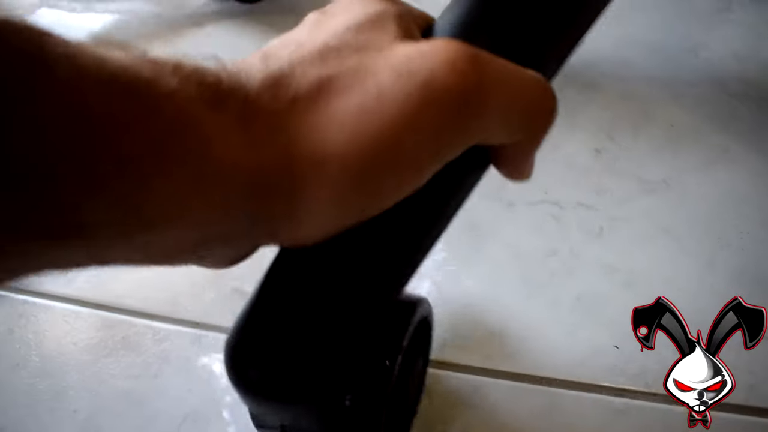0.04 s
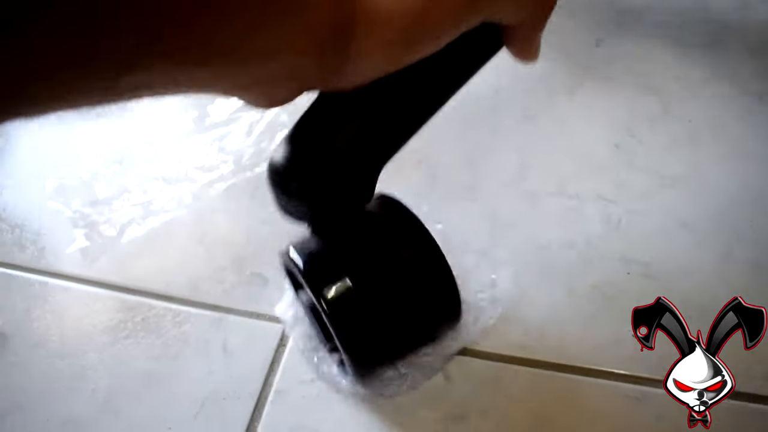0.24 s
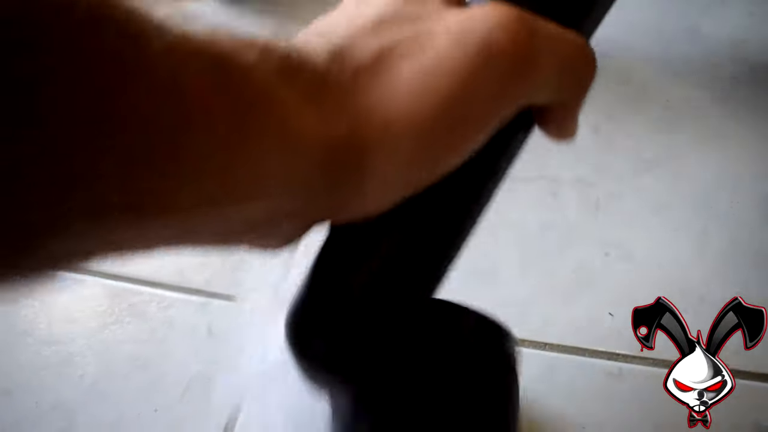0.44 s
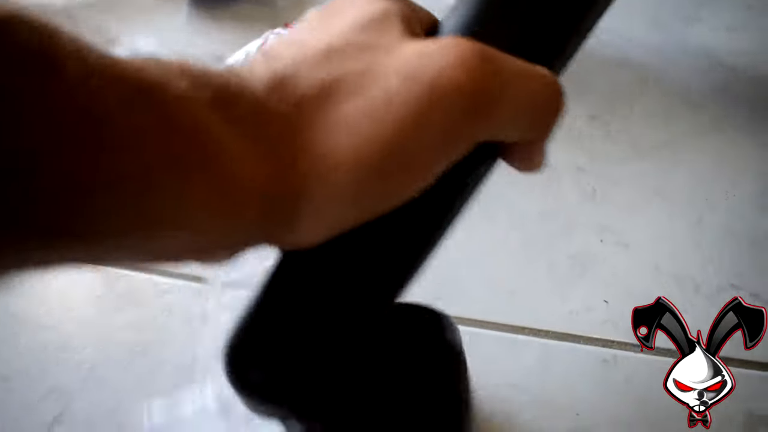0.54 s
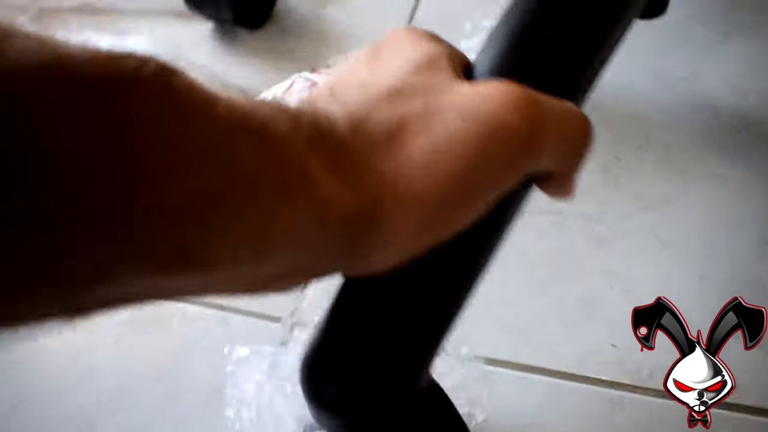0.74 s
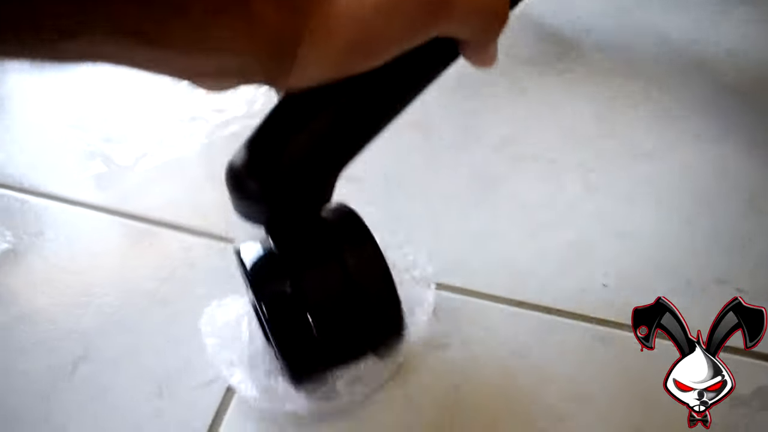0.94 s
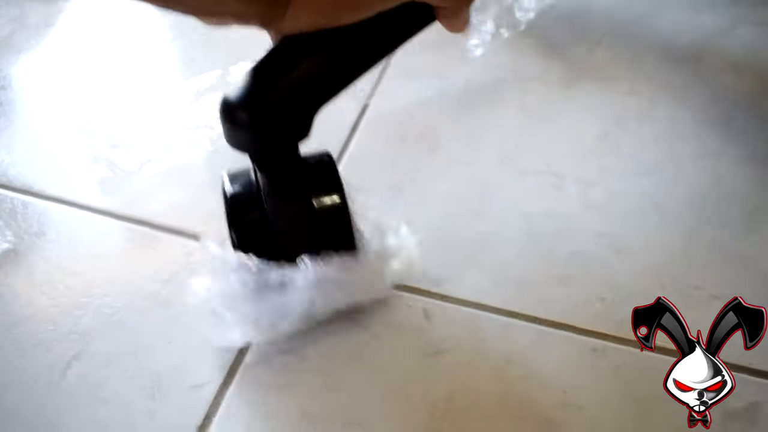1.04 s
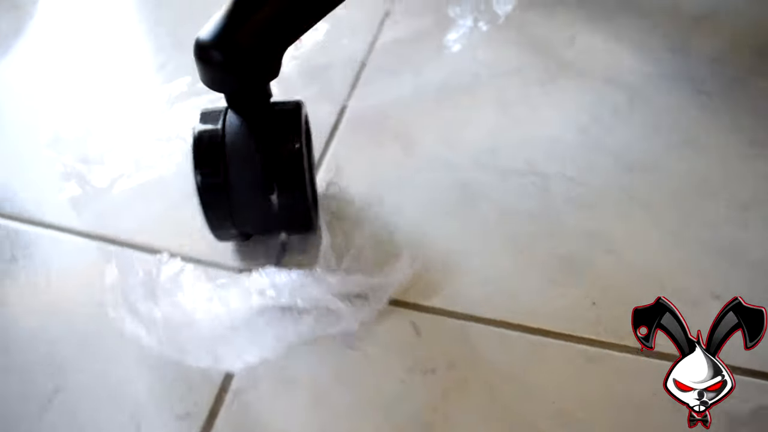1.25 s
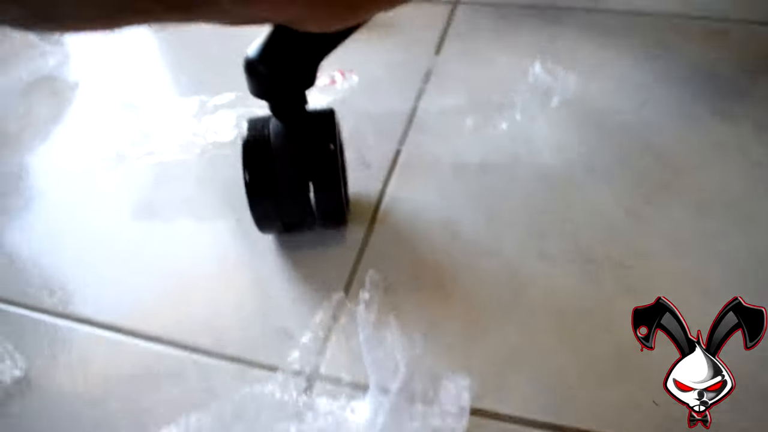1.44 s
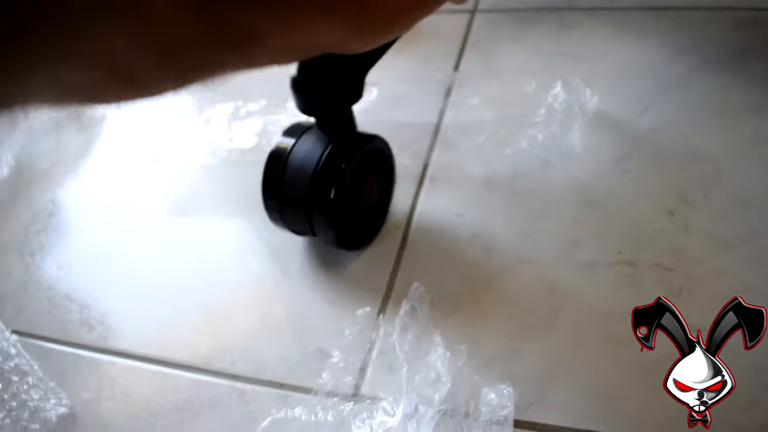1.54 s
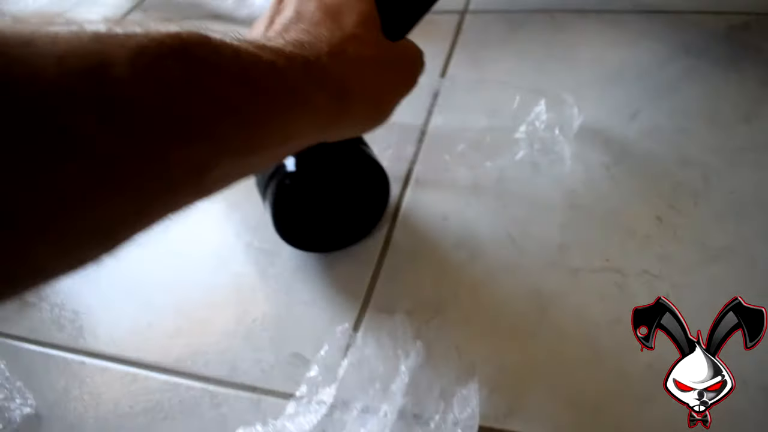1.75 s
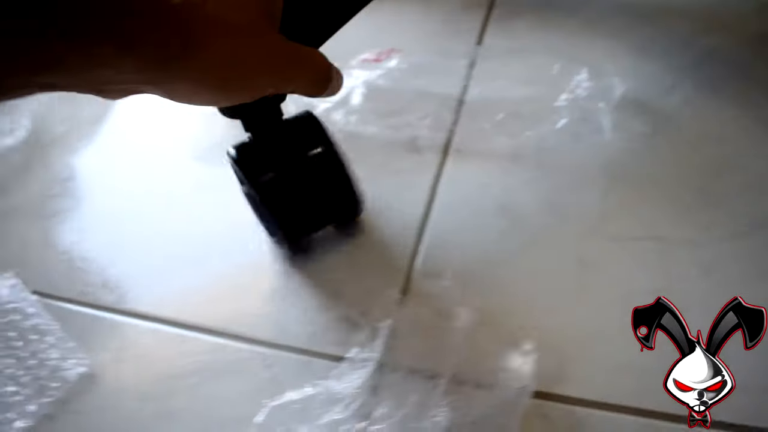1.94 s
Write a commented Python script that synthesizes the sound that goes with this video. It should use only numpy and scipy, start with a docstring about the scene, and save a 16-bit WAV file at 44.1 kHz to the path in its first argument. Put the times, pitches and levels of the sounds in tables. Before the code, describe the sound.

Bubble wrap bursts under a chair caster in sharp, irregular volleys, with film crinkling, knocks on tile and brief squeaks; the pops thin out, leaving light wheel rattles. Close microphone in a bare, reverberant tiled room.

```python
"""A bare tiled room: a chair caster is pushed over bubble wrap, close to the microphone.
Bubbles burst singly and in quick volleys, each a short pressure cycle, a noisy flutter and a bright snap.
Low thumps sound where loud bursts overload the microphone; random ticks crinkle and crunch the film.
The caster rings as decaying sines, squeaks on a wavering tone, rattles, and rolls as coloured noise.
A decaying noise tail answers as the room, and a fast limiter holds the loudest bursts down."""
import sys
import numpy as np
from scipy import signal
from scipy.fft import rfft, irfft
from scipy.io import wavfile
from scipy.ndimage import uniform_filter1d, minimum_filter1d

SR = 44100
rng = np.random.default_rng(int(sys.argv[2]) if len(sys.argv) > 2 else 0)


def materialize(psi):
    """Save the field psi as 16-bit PCM at rate SR to the path in sys.argv[1].

    A 1-D psi becomes a single channel; in a 2-D psi each row is a channel.
    """
    bounded = np.clip(np.atleast_2d(psi).T, -1, 1)
    quanta = np.round(bounded * 32767).astype(np.int16)
    wavfile.write(sys.argv[1], SR, quanta)


N = 88200


def undb(db):
    """Decibels to gain."""
    return 10 ** (np.asarray(db) / 20)


def unit(x):
    """Scale to rms 1."""
    return x / np.sqrt(np.mean(x ** 2))


def clock(size=N):
    """Time in seconds."""
    return np.arange(size) / SR


def fade(t60_s, size=N):
    """Exponential decay, falling 60 dB in t60_s."""
    return np.exp(-np.log(1000) * clock(size) / t60_s)


def curve(rows):
    """Gain along a (time_s, level_db) curve."""
    return undb(np.interp(clock(), *np.array(rows).T))


def swells(rows):
    """Gain of rounded swells from (start_s, length_s, level_db) rows."""
    gain = np.zeros(N)
    for start_s, length_s, level_db in rows:
        progress = np.clip((clock() - start_s) / length_s, 0, 1)
        gain += undb(level_db) * np.sqrt(np.abs(np.sin(np.pi * progress)))
    return gain


def colour(x, points):
    """Causal minimum-phase filter through (frequency_hz, gain_db) points."""
    size = 2 * x.shape[-1]
    hz, db = np.array(points).T
    gain_db = np.interp(np.log(np.fft.rfftfreq(size, 1 / SR) + 1), np.log(hz), db)
    # folding the cepstrum onto positive times makes the filter causal
    cepstrum = irfft(np.log(undb(gain_db)))
    cepstrum[1:size // 2] *= 2
    cepstrum[size // 2 + 1:] = 0
    response = np.exp(rfft(cepstrum))
    return irfft(rfft(x, size) * response)[..., :size // 2]


def band_noise(hz, octaves, size):
    """Noise in a bell around one frequency, at rms 1."""
    away = np.log2((np.fft.rfftfreq(size, 1 / SR) + 1) / hz) / octaves
    bell = 1 / (1 + away ** 2 + away ** 4 / 2)
    random_phase = np.exp(2j * np.pi * rng.random(len(away)))
    return unit(irfft(random_phase * bell, size))


def ticks(per_s):
    """Random impulses of either sign: many small, a few large."""
    happens = rng.random(N) < per_s / SR
    return happens * rng.random(N) ** 2 * rng.choice([-1, 1], N)


def struck(t60_s, size=N):
    """Envelope of a ring: it swells during the contact, then decays."""
    contact_s = 0.0023
    return (1 - np.exp(-(clock(size) / contact_s) ** 2)) * fade(t60_s, size)


def add(out, start_s, x):
    """Mix a sound in at a time."""
    i = max(int(start_s * SR), 0)
    out[i:i + len(x)] += x[:max(N - i, 0)]


def through(x, response):
    """Convolve with an impulse response."""
    return signal.fftconvolve(x, response)[:N]


# bursting bubbles: start_s, level_db, pitch_hz, snap_db (treble)
BUBBLE_BURSTS = [(0.2094, 1, 2180, -17), (0.2491, -12, 3360, 4.5), (0.2573, 8.5, 2900, -5.5),
                 (.2890, -1, 2520, -5), (0.2934, -2.5, 1105, -7), (.3020, 1, 2270, -19),
                 (0.3493, -2, 2500, -24), (0.4329, 1.5, 2270, -2.5), (0.4539, -8.5, 2110, -1),
                 (0.4648, 6.5, 1810, -10), (.4850, 0, 2600, -13), (0.4908, -3.5, 2170, -25),
                 (0.5481, -1.5, 2410, 1.5), (.5520, -1.5, 2080, -3), (0.6383, -4, 1670, -52),
                 (.6488, -5, 1840, -25), (.6716, -11, 1980, -7), (0.679, -6, 3070, -7),
                 (0.7334, -7, 3000, -33), (0.7631, 5, 2280, -45), (0.79, 11, 2470, -20),
                 (0.796, 1.5, 1680, -35), (0.8029, -3.5, 1670, -22), (.8104, 0, 1350, -27),
                 (.8177, -5.5, 1070, -47), (0.8287, -2.5, 1215, -29), (0.8471, -3.5, 1600, -14),
                 (0.9535, -14.5, 2950, 8.5), (0.961, -3, 1244, -50), (.9740, -1, 2210, -14),
                 (1.0365, -1.5, 2300, -16), (1.0701, 2, 2340, -14), (1.0766, 2, 2550, -25),
                 (1.1104, -16.5, 3480, 13.5), (1.127, -7.5, 1390, -21), (1.421, -9.5, 2200, -40),
                 (1.4226, -7, 2030, -33), (1.5252, -24, 2280, -35), (1.5474, -13.5, 2130, -40),
                 (1.5731, -21.5, 2390, -37), (1.7868, -17, 2200, -10)]
# tone of the bright snap: frequency_hz, gain_db
SNAP_TONE = [(100, -17), (2000, -12.5), (5000, 4.5), (7500, -7.5), (11000, -5.5), (15500, -20)]
BURST_DB, RISE_S = 5.5, 0.000079
MUFFLE_DB = 21  # each such drop in snap doubles the rise time
FLUTTER_DB, FLUTTER_OCTAVES, FLUTTER_T60_S = -5.5, 1, 0.016
SNAP_T60_S, CRACK_DB = 0.017, 18.5
BODY_TOP_RATIO = 1.85  # the body is low-passed at this multiple of its pitch
BURST_LOW_CUT_HZ = 490


def bubbles(size=2048):
    """A burst is a cycle or two of pressure, torn-film flutter and snap; smothered ones are dull and slow to rise."""
    out, t = np.zeros(N), clock(size)
    for start_s, level_db, pitch_hz, snap_db in BUBBLE_BURSTS:
        slowness = 2 ** (-snap_db / MUFFLE_DB)
        rise = 1 - np.exp(-t / (RISE_S * slowness))
        pressure = undb(BURST_DB) * np.sin(2 * np.pi * pitch_hz * t) * np.exp(-pitch_hz * t)
        flutter = band_noise(pitch_hz, FLUTTER_OCTAVES, size) * fade(FLUTTER_T60_S, size)
        flutter = undb(FLUTTER_DB) * flutter
        body_top_hz = min(BODY_TOP_RATIO * pitch_hz, SR / 3)
        body = signal.lfilter(*signal.butter(4, body_top_hz, fs=SR), rise * (pressure + flutter))

        crack = undb(CRACK_DB) * (t == 0)  # a single-sample click
        tear = rng.standard_normal(size) * fade(SNAP_T60_S, size) + crack
        snap = undb(snap_db) * colour(tear, SNAP_TONE) / 2
        add(out, start_s, undb(level_db) * (body + snap))
    return signal.lfilter(*signal.butter(2, BURST_LOW_CUT_HZ, "high", fs=SR), out)


# low thumps where loud bursts overload the microphone: start_s, level_db
OVERLOAD_THUMPS = [(0.211, -33), (0.2573, -13), (0.4349, -26), (0.4674, -24), (0.5497, -25), (0.847, -28)]


def thumps(size=2048):
    """Low thumps where loud bursts overload the microphone: one-sided pulses, stronger on the right."""
    peak_s = 0.00065
    out, age = np.zeros(N), clock(size) / peak_s
    for start_s, level_db in OVERLOAD_THUMPS:
        add(out, start_s, undb(level_db) * age * np.exp(1 - age))
    return np.array([out / 2, out])


# runs of ticks in folded film: start_s, length_s, level_db
FILM_CRUNCHES = [(.75, 0.15, -27.5), (1.06, 0.044, -36)]
# band edges of the crunch: frequency_hz
CRUNCH_BAND = [5220, 6120]
CRACKLES_PER_S = 220


def crunch():
    """Folded film gives way under the full load in a run of bright ticks."""
    bright = signal.lfilter(*signal.butter(2, CRUNCH_BAND, "band", fs=SR), ticks(CRACKLES_PER_S))
    return unit(bright) * swells(FILM_CRUNCHES)


# the loaded caster dropping onto the tile: start_s, level_db
TILE_KNOCKS = [(0.813, -5), (0.843, -4.5), (1.0370, -8), (1.0800, -7.5)]
# modes of the caster and chair leg: frequency_hz, level_db
CASTER_MODES = [(1123, 0.5), (1209, -1.5), (1417, 3), (2412, 1.5), (2828, 4.5), (3274, 1.5), (3765, 3),
                (4355, -5), (5210, -14), (5825, -8)]
RING_DB, RING_T60_S = -12.5, 0.16
RING_BY_BURSTS_DB = -15.5  # drive from each burst, relative to its level


def caster():
    """Knocks and bursts ring the modes of the caster and chair leg."""
    blows = np.zeros(N)
    for start_s, level_db in TILE_KNOCKS:
        add(blows, start_s, undb([level_db]))
    for start_s, level_db, _, _ in BUBBLE_BURSTS:
        add(blows, start_s, undb([level_db + RING_BY_BURSTS_DB]))
    ring = np.zeros(N)
    for k, (hz, level_db) in enumerate(CASTER_MODES):
        polarity = (-1) ** k
        ring += polarity * undb(level_db) * np.sin(2 * np.pi * hz * clock())
    return undb(RING_DB) * through(blows, ring * struck(RING_T60_S))


# taps of the loose wheel: start_s, level_db, centre_hz (the modes nearest it ring loudest)
WHEEL_TAPS = [(1.3830, -19.5, 1450), (1.59, -22, 1300), (1.714, -29.5, 2630), (1.7641, -22.5, 2850),
              (1.771, -16, 1300), (1.796, -16.5, 2840), (1.803, -13.5, 1900), (1.9159, -20.5, 1450)]
# modes of the wheel: frequency_hz
WHEEL_MODES = [1396, 2400, 2960, 3720]
WHEEL_T60_S, TAP_OCTAVES = 0.079, 0.47
THUD_DB, THUD_T60_S = -1.5, 0.022


def rattles(size=4096):
    """The loose wheel taps on its axle: a small thud and a short ring, higher for a harder contact."""
    out = np.zeros(N)
    for start_s, level_db, centre_hz in WHEEL_TAPS:
        ring = np.zeros(size)
        for hz in WHEEL_MODES:
            tone = np.sin(2 * np.pi * (hz * clock(size) + rng.random()))
            ring += tone / (1 + (np.log2(hz / centre_hz) / TAP_OCTAVES) ** 2)
        ring = ring * struck(WHEEL_T60_S, size) / 2
        thud = colour(rng.standard_normal(size) * fade(THUD_T60_S, size), ROLL_TONE)
        thud = undb(THUD_DB) * thud / np.abs(thud).max()
        add(out, start_s, undb(level_db) * (ring + thud))
    return out


# squeaks of the wheel on the film: start_s, length_s, level_db
WHEEL_SQUEAKS = [(0.341, 0.036, -17.5), (0.722, 0.017, -25), (0.84, 0.017, -6), (1.08, 0.046, -10.5)]


def squeaks():
    """The wheel sticks and slips on the film with a short, wavering whistle."""
    pitch_hz, wobble_depth = 3822, 0.0057  # depth is the rms share of the pitch
    wobble = unit(uniform_filter1d(rng.standard_normal(N), size=200))
    cycles = np.cumsum(pitch_hz * (1 + wobble_depth * wobble)) / SR
    return np.sin(2 * np.pi * cycles) * swells(WHEEL_SQUEAKS)


# crinkling of the film over time: time_s, level_db
CRINKLE_LEVEL = [(0, -26), (.15, -36.5), (.22, -33), (.3, -21), (.4, -32.5), (.755, -30), (.8, -17.5),
                 (.85, -26), (.92, -35.5), (1.08, -24), (1.23, -42.5), (1.34, -33), (1.65, -46),
                 (1.78, -40), (2, -43)]
# tone of the crinkle: frequency_hz, gain_db
CRINKLE_TONE = [(40, -40), (500, -18), (1300, -1), (4600, -5), (6000, -9), (7700, -12.5), (12000, -16),
                (15500, -36.5)]


def crinkle():
    """Dense tiny ticks of creasing film."""
    crinkles_per_s = 3500
    return unit(colour(ticks(crinkles_per_s), CRINKLE_TONE)) * curve(CRINKLE_LEVEL)


# rolling of the wheel on the tiles over time: time_s, level_db
ROLL_LEVEL = [(0, -39.5), (.16, -46.5), (.3, -23), (.41, -37), (.5, -24.5), (.72, -28), (.82, -19),
              (1.0, -38), (1.25, -41.5), (1.5, -37.5), (1.68, -50.5), (1.8, -37), (2, -42)]
# tone of the rolling grind and the tap thuds: frequency_hz, gain_db
ROLL_TONE = [(30, -65), (120, -11), (650, 2.5), (1400, 4), (3000, 3.5), (6000, -18), (15000, -71)]
# tone of the crushed creases: frequency_hz, gain_db
CRACKLE_TONE = [(150, -26), (700, 14.5), (3800, 6), (8000, -41)]
CRACKLE_DB = 0.5  # relative to the grind


def rolling():
    """The hard wheel grinds over the tiles and crushes small creases as it goes."""
    grind = unit(colour(rng.standard_normal(N), ROLL_TONE))
    crackle = undb(CRACKLE_DB) * unit(colour(ticks(CRACKLES_PER_S), CRACKLE_TONE))
    return (grind + crackle) * curve(ROLL_LEVEL)


# tone of the bare room: frequency_hz, gain_db
ROOM_TONE = [(40, -74), (150, -15.5), (750, 5), (2200, -3), (3500, 0.5), (4500, -6), (6000, 1), (8000, 0.5),
             (15500, -8)]
ROOM_DB, ROOM_T60_S, ROOM_BUILD_S = -2, 0.53, 0.00093


def room(x):
    """Dense reflections that build quickly and die away in half a second."""
    build = 1 - np.exp(-clock() / ROOM_BUILD_S)
    tail = rng.standard_normal(N) * fade(ROOM_T60_S) * build
    return undb(ROOM_DB) * through(x, colour(tail / np.linalg.norm(tail), ROOM_TONE))


# left-right difference of the scattered sound: frequency_hz, gain_db
STEREO_WIDTH = [(60, -14), (600, -38.5), (2200, -18), (4500, -12), (8000, -4.5)]


def spread(mid, side):
    """Left and right: most alike around 600 Hz, further apart in the treble and deep bass."""
    side = colour(side, STEREO_WIDTH)
    return np.array([mid + side, mid - side])


ECHO_S, ECHO_DB = 0.0066, -12
WHEEL_ROOM_DB = -7  # room send of ring, rattle and squeak, relative to the bursts


def scene():
    """Bursts and wheel in the centre, one near reflection from the side, and the room around them."""
    film = bubbles() + crunch()
    wheel = caster() + rattles() + squeaks()
    echo = np.zeros(N)
    add(echo, ECHO_S, undb(ECHO_DB) * film)
    send = film + undb(WHEEL_ROOM_DB) * wheel
    # fresh random draws for mid and side widen the room, crinkle and rolling
    mid, side = (echo + room(send) + crinkle() + rolling() for _ in range(2))
    return film + wheel + thumps() + spread(mid, side)


def record(dry):
    """A very fast limiter holds the loudest bursts down; the top is cut."""
    ceiling, top_hz = 1.0, 15800
    allowed = ceiling / np.maximum(np.abs(dry), ceiling)
    # hold the lowest gain over 21 samples, then smooth it
    gain = uniform_filter1d(minimum_filter1d(allowed, size=21), size=21)
    top_cut = signal.ellip(8, .2, 70, top_hz, fs=SR, output="sos")
    return signal.sosfilt(top_cut, dry * gain)


dry = scene()
out = record(dry)
materialize(out)
```